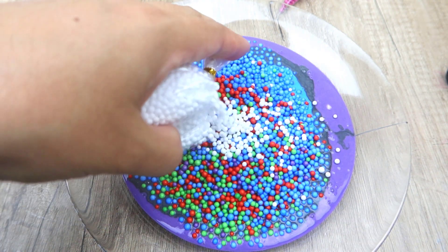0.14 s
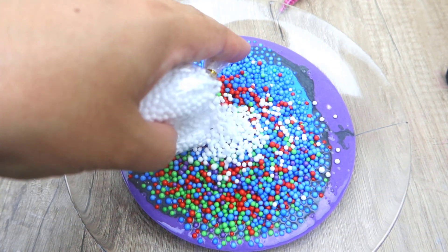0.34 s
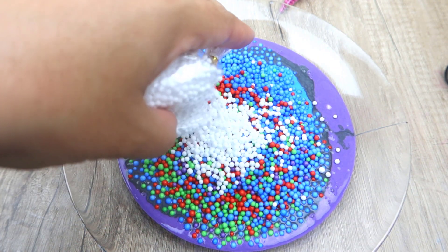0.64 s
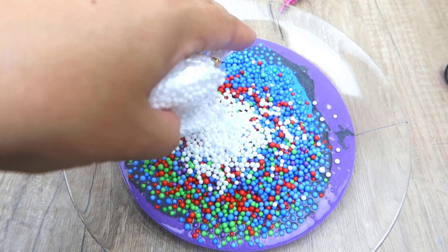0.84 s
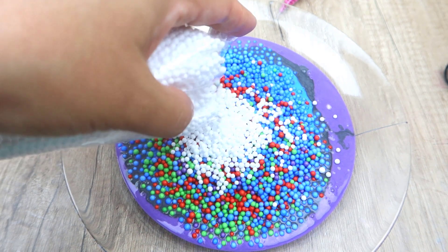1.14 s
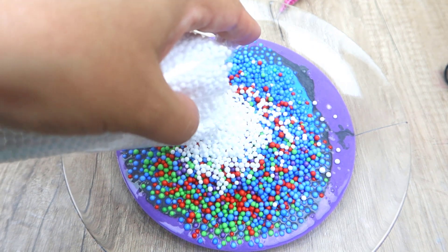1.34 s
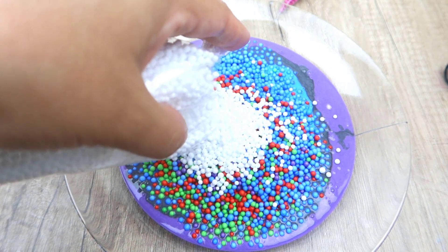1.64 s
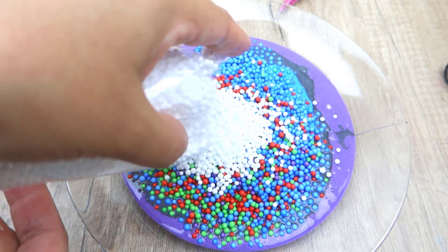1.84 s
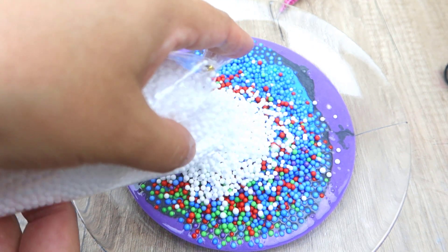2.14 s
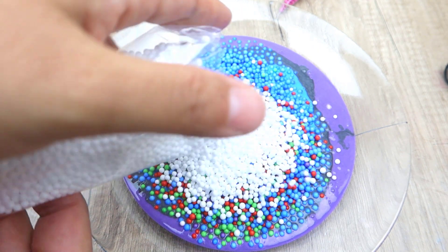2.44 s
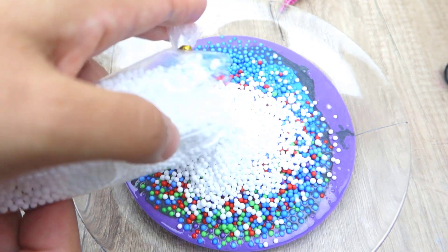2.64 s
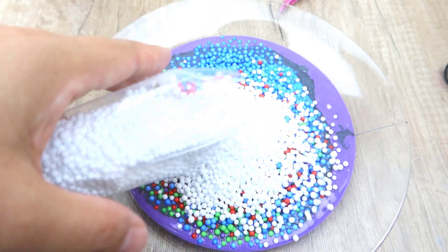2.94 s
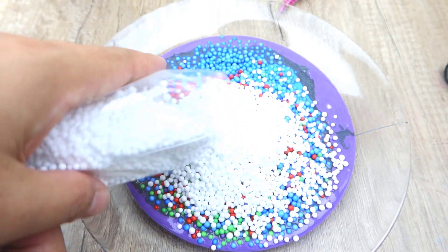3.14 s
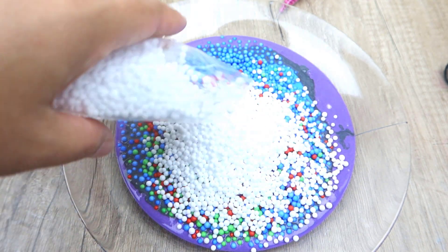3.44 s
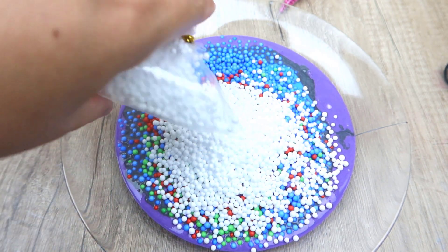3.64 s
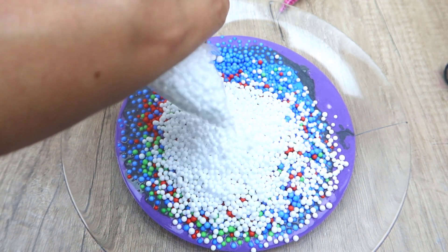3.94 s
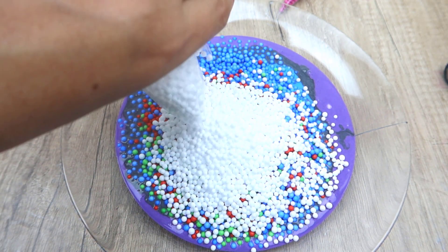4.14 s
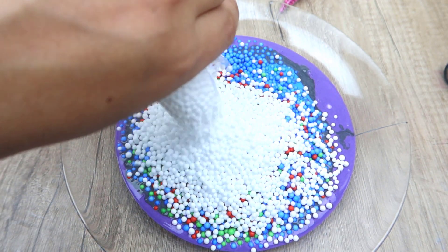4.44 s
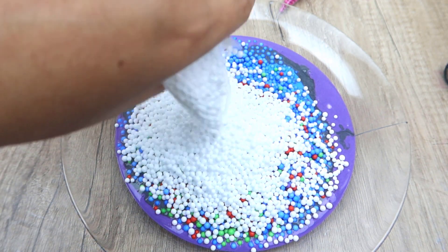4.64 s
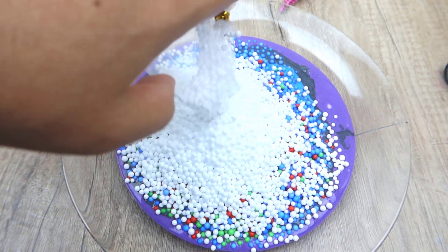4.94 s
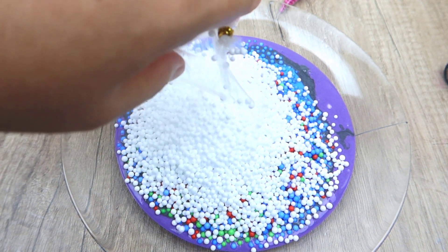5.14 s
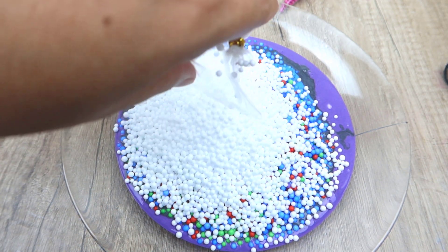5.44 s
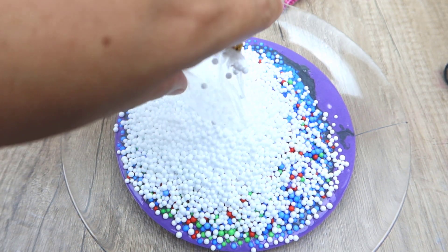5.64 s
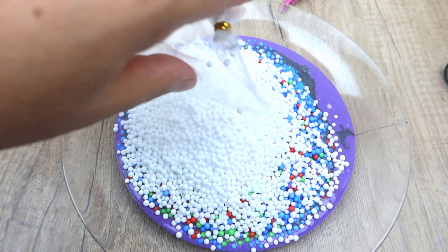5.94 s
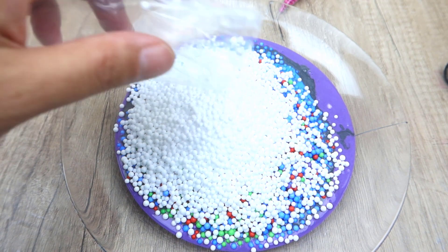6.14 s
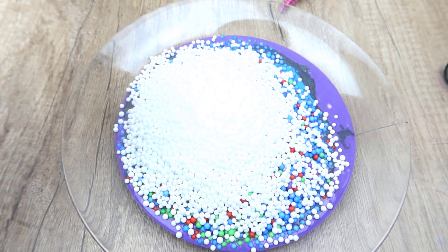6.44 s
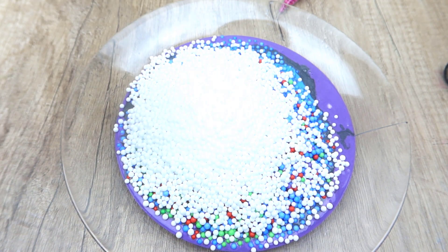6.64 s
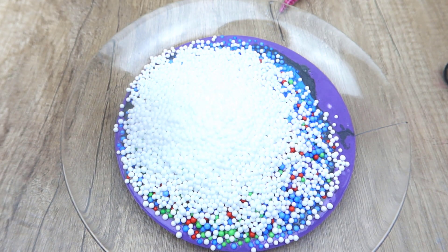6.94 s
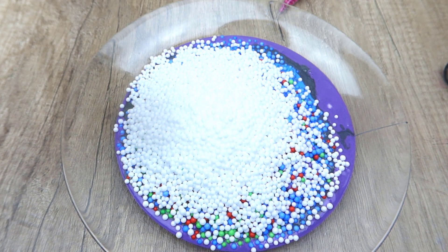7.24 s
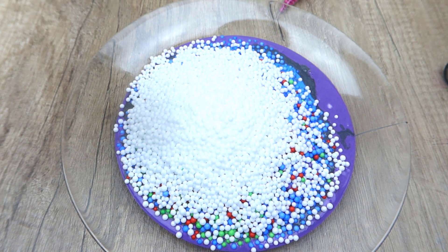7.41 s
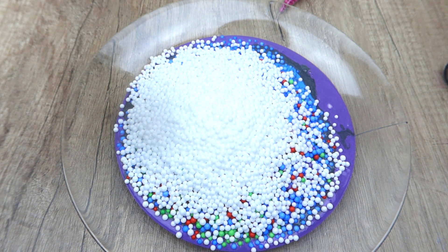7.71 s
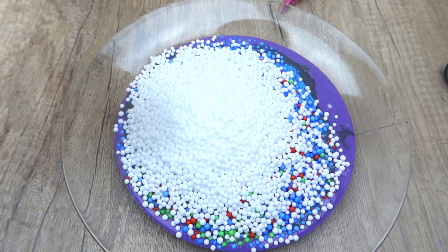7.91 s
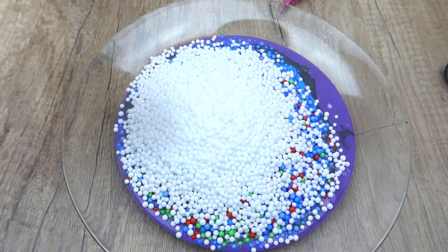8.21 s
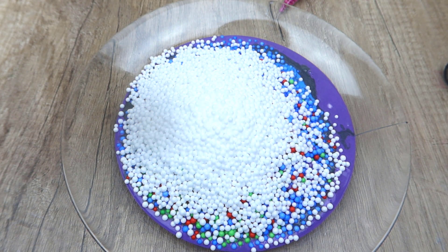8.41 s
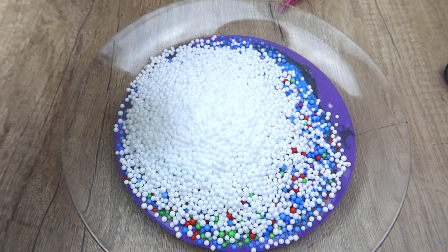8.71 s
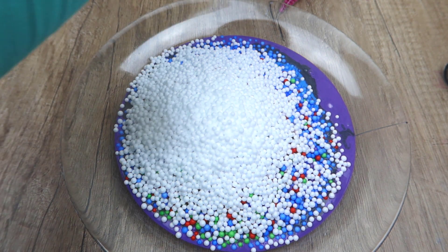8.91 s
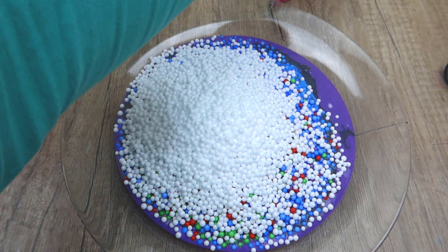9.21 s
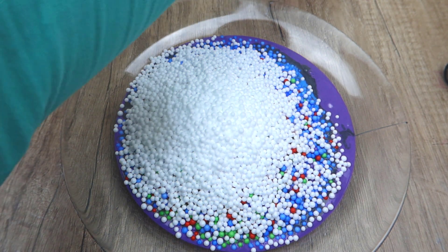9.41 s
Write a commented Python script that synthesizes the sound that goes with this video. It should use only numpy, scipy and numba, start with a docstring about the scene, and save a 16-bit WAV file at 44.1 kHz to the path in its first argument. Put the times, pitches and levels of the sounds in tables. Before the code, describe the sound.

Close, dry tabletop sound with faint hiss and low hum. A brief bead rush leads into a hard, clipping knock that ducks the level. Soft trickling swells into repeated dry, sandy rushes with crisp film crackles and little pops, strongest midway. Then it thins to near silence, slack plastic rustles, a few duller knocks rattle the stand, and another bag is picked up with coarse crackling.

```python
"""A soft rush of foam beads comes first, then a hard bump on the camera stand that overloads the microphone.
The level ducks and recovers. Beads hiss from a squeezed plastic bag as its film crackles and pops;
the empty bag is put down, the stand is bumped again, and a second bag is picked up.
Bags and beads are showers of tiny random contacts passed through tone filters and shaped by swells;
bumps are short pushes that set the stand ringing, with clicks of hard contact or overload crackle."""
import sys
import numpy as np
from scipy import signal
from scipy.fft import rfft, irfft
from scipy.io import wavfile
from scipy.ndimage import uniform_filter1d
from numba import njit

SR = 44100
rng = np.random.default_rng(int(sys.argv[2]) if len(sys.argv) > 2 else 0)


def to_wav(s):
    """Save 16-bit WAV."""
    ch = np.atleast_2d(s).T  # columns
    pcm = np.round(np.clip(ch, -1, 1) * 32767)  # PCM
    wavfile.write(sys.argv[1], SR, pcm.astype(np.int16))


N = 422037  # length in samples
T = np.arange(N) / SR  # time in seconds

# Tone of the quiet room with microphone hiss: pitch_hz, level_db (relative)
ROOM_TONE = [(25, -28.5), (42, -9.5), (55, -8.5), (75, -15), (107, -11), (170, -14.5), (350, -16.5),
             (670, -20.5), (1100, -25), (2900, -33), (7000, -36), (15500, -38.5)]
ROOM_DB = -50  # average (rms) level of the room noise
# Mains hum: pitch_hz, level_db (rms)
MAINS_HUM = [(50, -54), (102, -62)]

# Tone of the creaking stand: pitch_hz, level_db (relative)
CREAK_TONE = [(30, -37), (80, -18), (180, -13), (280, -6), (350, 0), (440, -5.5), (560, -12.5),
              (800, -19.5), (2000, -51.5)]
# The stand creaks as it is brushed and settles: peak_s, level_db, rise_s, fall_s
CREAKS = [(.42, -21.5, .045, 0.044), (.567, -30, .02, 0.012), (.6, -31.5, 0.0073, 0.017),
          (.73, -44.5, 0.079, 0.035), (.85, -42, .025, 0.071), (1.62, -46.5, 0.084, 0.22),
          (5.72, -48.5, 0.077, .12)]
# The stand sways and shivers after a push: start_s, level_db (before rise and decay), pitch_hz, t60_s
SHIVERS = [(.211, -3, 70, 0.056), (.283, 2, 48, 0.099), (.608, -36, 328.5, 0.28), (.668, -34.5, 360, 0.18),
           (.877, -34.5, 354, 0.49), (5.7, -29, 80, 0.058), (7.485, -29.5, 335, 0.096),
           (7.495, -31, 140, 0.15), (7.533, -19, 85.5, .045), (7.546, -10.5, 358, 0.054),
           (7.575, -34.5, 349, 0.61), (7.622, -33, 139, 0.1), (7.7415, -5.5, 317, 0.035)]
# Blows on the stand, and the crackle of the overloaded microphone at 0.277-0.289 s:
# start_s, thump_peak_db, contact_ms, click_db (relative to the thump)
KNOCKS_AND_OVERLOAD = [(0.2086, 8, 0.89, 0), (0.2173, 19, 1.72, -66), (0.229, 6, 0.79, -50),
                       (0.277, 22.5, 0.74, 0), (0.2814, 12, 0.86, 2), (0.2864, 22, 1.66, 3.5),
                       (0.2872, 9.5, 1.9, 11), (0.306, 32, 1.03, -24), (.316, 13, 1.6, -27),
                       (7.486, -31, 2.1, -40), (7.5305, -13.5, 0.97, -27), (7.5341, -2.5, 1.13, -51),
                       (7.6085, -13.5, 1.4, -50), (7.641, -25, 1.2, -40), (7.7347, -18.5, 0.88, -30),
                       (7.7384, -12, 1.5, -52)]
RING_HZ = 937  # one of the pitches in the next table
# Ringing tones of the stand and camera body: pitch_hz, level_db (relative), t60_s
STAND_TONES = [(151, -19, 0.085), (240, -0.5, 0.015), (292, 0, 0.031), (350, -26, 0.13), (460, -3, 0.036),
               (560, -13.5, 0.028), (860, -5.5, 0.041), (RING_HZ, -23.5, 0.24), (1100, -16.5, 0.091),
               (1800, -12.5, 0.028)]
# Tone of the clicks, which are hard contact or overload crackle: pitch_hz, level_db (relative)
CLICK_TONE = [(300, 6.5), (1500, -3.5), (4000, -9.5), (6000, -6.5), (8500, -16.5), (16000, -22.5)]

# Tone of the full second bag: pitch_hz, level_db (relative)
FULL_BAG_TONE = [(150, -1), (500, -5), (1050, 2), (1400, 5), (1780, 8), (2150, 4), (2900, 0.5), (3800, 4),
                 (4400, 4), (5300, 3), (6500, -4.5), (9000, -11.5), (12000, -16), (16000, -32)]
# The second bag is touched, gripped and lifted:
# peak_s, level_db, rise_s, fall_s, treble_db (relative to the level)
GRIPS = [(8.07, -49.5, 0.019, 0.033, -12), (8.41, -57, 0.11, 0.21, -5.5), (9.168, -37.5, 0.0018, .018, -2),
         (9.192, -39.5, .007, .012, -7), (9.213, -32.5, .003, .013, -14), (9.276, -46, 0.0065, .009, -11),
         (9.333, -28, 0.0038, 0.023, -1.5), (9.395, -30, 0.025, 0.041, -3), (9.49, -44, .07, 0.067, -7),
         (9.565, -36, 0.033, .05, -4)]
# Tone of the emptied, slack bag: pitch_hz, level_db (relative)
SLACK_BAG_TONE = [(100, -15), (400, 3), (900, 8), (1600, 5), (2600, 2.5), (4400, 2), (6000, -15.5),
                  (9500, -26.5), (16000, -36)]
# The empty bag crumples as it is laid down and later nudged:
# peak_s, level_db, rise_s, fall_s, treble_db (relative to the level)
CRUMPLES = [(6.93, -40, 0.028, .04, -17), (6.99, -40.5, .03, 0.054, -7.5), (7.04, -45, 0.018, 0.057, -6),
            (7.17, -51, 0.023, 0.065, -8), (7.26, -45, 0.03, 0.018, 0.5), (7.315, -52.5, .03, 0.038, -2),
            (8.582, -45, 0.0078, 0.052, -33)]

# Taut film popping: start_s, level_db (before rise and decay), pitch_hz
POPS = [(2.337, -27, 405), (4.028, -18, 1630), (4.272, -22.5, 447), (4.581, -16.5, 1380),
        (4.884, -19, 1200), (5.023, -24.5, 1240), (5.172, -13.5, 3700), (5.401, -28, 1260),
        (5.401, -33, 2200), (5.6206, -20.5, 1530), (6.921, -24, 720), (7.2591, -20.5, 1470),
        (8.575, -26.5, 2260), (9.217, -23, 1900)]
POP_T60_S, POP_REF_HZ = 0.016, 1000  # ring time at this pitch; it falls with the root of the pitch
# Large folds of film snapping: start_s, level_db, thud_db and treble_db (both relative to the level)
CRACKLES = [(0.8269, -30, -10, -7), (2.022, -29.5, -12, -15), (2.3384, -29.5, -5, -10),
            (2.4883, -23.5, -22, -11), (3.1, -28.5, -9, -16), (3.1977, -26.5, -14, -11),
            (3.2678, -26.5, -32, -12), (3.2824, -27, -15, -8), (3.3843, -23.5, -9, -8),
            (3.4269, -26.5, -20, -30), (3.512, -24.5, -1, -22), (3.5754, -37.5, 3, -6),
            (3.7859, -20, -8, -15.5), (3.8645, -28, -0.5, -22), (3.919, -19, -7.5, -13.5),
            (4.028, -32.5, 2, -32), (4.085, -31.5, -6, -23), (4.5074, -19, -30, -8),
            (4.5803, -21.5, -9.5, -30), (4.882, -28.5, -8, -33), (5.172, -25.5, -8.5, -6.5),
            (5.4, -40, 8, -30), (5.4714, -42, 0.5, -13), (5.5126, -47.5, 5, -15), (5.82, -34, -19, -4.5),
            (5.8608, -38.5, -18, -5.5), (6.2876, -44, -13, -22), (6.8917, -45, 9, -18),
            (6.9208, -37.5, 10, -5), (7.1478, -38.5, -26, -13), (7.234, -33, -6, -20),
            (7.26, -34.5, -11, -5), (7.3066, -33.5, -13, -15), (8.197, -48.5, -11, 4.5),
            (8.427, -49.5, -20, 5.5), (8.576, -47, 12, -30), (9.2099, -33.5, -6, -1),
            (9.3307, -30, -5, -12), (9.4363, -36.5, 0.5, -1)]
# Tone of a snapping fold: pitch_hz, level_db (relative)
FOLD_TONE = [(100, -15.5), (350, -11), (900, -9), (1550, -1), (2450, -10), (3800, -5), (5000, -6),
             (6200, -11), (9500, -10.5), (12000, -26), (16000, -25)]

# Tone of the beads in the first bag: pitch_hz, level_db (relative)
BEAD_TONE = [(60, -23), (400, -12.5), (900, -7), (1200, -5), (1680, 1), (2000, -5.5), (2450, -4.5),
             (3500, -3), (4700, -2.5), (5300, -7), (6000, -13.5), (10000, -17), (11500, -24.5),
             (16000, -34)]
# Squeezes and shakes of the first bag, each sending a rush of beads:
# peak_s, level_db, rise_s, treble_db (relative to the level)
SQUEEZES = [(0.077, -45.5, 0.068, -18), (0.169, -41, 0.063, -12.5), (0.457, -38.5, 0.058, -16),
            (0.72, -44, .055, -17), (0.827, -45.5, 0.046, -11), (1.059, -45.5, .125, -12.5),
            (2.007, -37, 0.062, -9), (2.276, -38, 0.14, -13.5), (2.497, -34.5, 0.074, -10.5),
            (2.85, -40.5, 0.072, -11.5), (3.036, -46, 0.068, -14), (3.25, -37.5, 0.1, -16),
            (3.418, -42.5, 0.073, -24), (3.55, -46, 0.075, -25), (3.857, -33, 0.15, -15),
            (4.316, -31.5, 0.12, -14.5), (4.515, -30, 0.13, -13), (4.751, -31, 0.089, -12.5),
            (4.975, -40, 0.29, -11), (5.715, -50.5, .13, -15), (6.58, -49, 0.14, -8), (6.8, -54, 0.11, -2)]
RELEASE_SHARE = 0.7  # fall time of a rush as a share of its rise time
# The trickle between squeezes until the bag is empty: time_s, level_db
TRICKLE = [(0, -52), (.6, -51), (.95, -54), (1.4, -48), (2.7, -44.5), (3.7, -48.5), (4.2, -50),
           (5.3, -52.5), (6, -78), (6.9, -90)]
TRICKLE_TREBLE_DB = -9.5  # relative to the trickle level
SWELL_SHAPE = 1.12  # 1 is a pointed swell, 2 a rounded one


def undb(db):
    """Turn decibels into gain."""
    return 10 ** (np.asarray(db) / 20)


def unit(x):
    """Scale to an average (rms) level of 1."""
    return x / np.sqrt(np.mean(x ** 2))


def add(out, s, x):
    """Mix x into out from time s."""
    i = max(int(s * SR), 0)
    out[i:i + len(x)] += x[:max(N - i, 0)]


def colour(x, points, size=4096):
    """Give x a tone set by (Hz, dB) points, with a filter that never rings before the sound."""
    hz, db = np.transpose(points)
    f = np.maximum(np.fft.rfftfreq(size, 1 / SR), 1)
    log_gain = np.log(undb(np.interp(np.log(f), np.log(hz), db)))
    # Folding the cepstrum onto its first half makes the filter causal.
    cepstrum = irfft(log_gain)
    cepstrum[1:size // 2] *= 2
    cepstrum[size // 2 + 1:] = 0
    response = irfft(np.exp(rfft(cepstrum)))
    return signal.fftconvolve(x, response)[:len(x)]


def split(x, hz, order=4):
    """Split x into parts below and above hz whose sum is level at every pitch."""
    parts = []
    for kind in ("low", "high"):
        sos = signal.butter(order, hz, kind, fs=SR, output="sos")
        parts.append(signal.sosfilt(np.vstack([sos, sos]), x))
    return parts


def fade(t, t60):
    """Die away steadily, by 60 dB in t60 seconds."""
    return undb(-60 * t / max(t60, 1e-4))


def walk(rate):
    """Wander smoothly at random, with an rms of 1, taking `rate` new values a second."""
    k = int(SR / rate)
    steps = np.repeat(rng.standard_normal(N // k + 1), k)
    return unit(uniform_filter1d(steps, k)[:N])


def grains(per_s, spread_db):
    """Tiny contacts at random moments, a few larger than the rest."""
    hit = rng.random(N) < per_s / SR
    sign = np.sign(rng.standard_normal(N))
    size_db = spread_db * np.minimum(rng.exponential(size=N), 5)
    return hit * sign * undb(size_db)


def swells(rows):
    """Loudness of overlapping movements (peak s, dB, rise s, fall s); their powers add."""
    power = np.zeros(N)
    for s, db, rise_s, fall_s in rows:
        t = np.arange(max(-4 * rise_s, -s), 4 * fall_s, 1 / SR)
        away = np.where(t < 0, -t / rise_s, t / fall_s)  # distance from the peak
        level = undb(db) * np.exp(-away ** SWELL_SHAPE)
        add(power, s + t[0], level ** 2)
    return np.sqrt(power)


def rings(rows, rise_s):
    """Each row is one pure tone that swells quickly and dies away."""
    out, t = np.zeros(N), T[:16384]
    for s, db, hz, t60 in rows:
        tone = np.sin(2 * np.pi * hz * t) * fade(t, t60)
        add(out, s, undb(db) * tone * (1 - np.exp(-t / rise_s)))
    return out


def rustle(moves, contacts, spectrum, steady=0, steady_treble=0):
    """Contacts ring the bag as loudly as the hand moves it, with a separate level for the treble."""
    body, sheen = split(colour(contacts, spectrum), 5700)
    level = swells([(s, db, rise, fall) for s, db, rise, fall, treble in moves])
    bright = swells([(s, db + treble, rise, fall) for s, db, rise, fall, treble in moves])
    return np.hypot(level, steady) * unit(body) + np.hypot(bright, steady_treble) * unit(sheen)


def room():
    """Steady dull room noise and microphone hiss, plus the pure tones of mains hum."""
    hum = sum(undb(db) * unit(np.sin(2 * np.pi * hz * T)) for hz, db in MAINS_HUM)
    noise = unit(colour(rng.standard_normal(N), ROOM_TONE))
    return undb(ROOM_DB) * noise + hum


def reflections(x, wet_db=-15, t60=0.14):
    """The table and near walls return a short, faint tail of fading noise."""
    t = T[:12000]
    tail = rng.standard_normal(len(t)) * fade(t, t60) * (t > .003)  # starts 3 ms late
    tail /= np.sqrt(np.sum(tail ** 2))
    return x + undb(wet_db) * signal.fftconvolve(x, tail)[:N]


def creak():
    """Small slips reach the microphone through the stand as a hollow rumble."""
    slips = colour(grains(per_s=700, spread_db=0.6), CREAK_TONE)
    return unit(slips) * swells(CREAKS)


def shivers():
    """A pushed stand sways and shivers in fading tones."""
    return rings(SHIVERS, rise_s=0.0016)


def knocks_and_overload(click_t60=0.0073, whine_hz=6600, whine_db=-26, whine_t60=0.022):
    """Brief pushes ring the stand; the clicks, noise with a high tone, are hard contact or overload crackle."""
    out, t = np.zeros(N), T[:16384]
    ring = sum(undb(db) * np.cos(2 * np.pi * hz * t) * fade(t, t60) for hz, db, t60 in STAND_TONES)
    whine = undb(whine_db) * np.sin(2 * np.pi * whine_hz * t) * fade(t, whine_t60)
    for s, db, contact_ms, click_db in KNOCKS_AND_OVERLOAD:
        push = np.sin(np.pi * np.minimum(1000 * t / contact_ms, 1))  # half a sine wave
        thump = signal.fftconvolve(push, ring)[:len(t)]
        click = colour(rng.standard_normal(len(t)) * fade(t, click_t60), CLICK_TONE)
        click = click / abs(click).max() + whine
        add(out, s, undb(db) * (thump / abs(thump).max() + undb(click_db) * click))
    return out


def second_bag(clump_db=1.5):
    """A full bag is gripped: coarse, bright crinkling whose contacts come in clumps."""
    creases = grains(per_s=4000, spread_db=3.0) * undb(clump_db * walk(160))
    return rustle(GRIPS, creases, FULL_BAG_TONE)


def empty_bag(clump_db=2.5):
    """Slack film creases in uneven clumps against the table."""
    creases = grains(per_s=1500, spread_db=0.7) * undb(clump_db * walk(170))
    return rustle(CRUMPLES, creases, SLACK_BAG_TONE)


def pops():
    """Taut patches of film ring briefly, the higher ones for a shorter time."""
    rows = [(s, db, hz, POP_T60_S * np.sqrt(POP_REF_HZ / hz)) for s, db, hz in POPS]
    return rings(rows, rise_s=0.00031)


def crackles(snap_t60=0.0015, crumple_db=-8, crumple_t60=0.022, shaken_db=-22, shaken_t60=0.063):
    """A fold snaps, its neighbours crumple after it, and the beads behind it are shaken."""
    out, t = np.zeros(N), T[:4096]
    crumple = undb(crumple_db) * fade(t, crumple_t60)
    shaken = undb(shaken_db) * fade(t, shaken_t60)
    force = fade(t, snap_t60) + crumple + shaken
    for s, db, thud_db, treble_db in CRACKLES:
        chance = rng.standard_normal((2, len(t)))
        rough = chance[0] * np.exp(.5 * chance[1])  # noise with some extra-large spikes
        low, rest = split(colour(rough * force, FOLD_TONE), 1000, order=2)
        middle, high = split(rest, 5500)
        for part, part_db in ((low, thud_db), (middle, 0), (high, treble_db)):
            peak = np.sqrt(uniform_filter1d(part ** 2, size=128).max())  # loudest 3 ms
            add(out, s, part * undb(db + part_db) / peak)
    return out


def small_folds(per_s, t60):
    """Little folds give way at random, each in a brief spray of contacts."""
    starts = abs(grains(per_s, spread_db=0.0))
    force = signal.fftconvolve(starts, fade(T[:4096], t60))[:N]
    return unit(force * rng.standard_normal(N))


def pouring(surge_db=2.6, ticks_db=-6, folds_db=-10):
    """Thousands of light beads rub each other in small surges; single ones tick on the creasing film."""
    rubbing = unit(grains(per_s=9000, spread_db=1.0)) * undb(surge_db * np.tanh(walk(45)))
    ticks = undb(ticks_db) * unit(grains(per_s=300, spread_db=2.5))
    folds = undb(folds_db) * small_folds(per_s=30, t60=0.016)
    rushes = [(s, db, rise, RELEASE_SHARE * rise, treble) for s, db, rise, treble in SQUEEZES]
    trickle_s, trickle_db = np.transpose(TRICKLE)
    trickle = undb(np.interp(T, trickle_s, trickle_db))
    trickle_treble = trickle * undb(TRICKLE_TREBLE_DB)
    return rustle(rushes, rubbing + ticks + folds, BEAD_TONE, trickle, trickle_treble)


def scene():
    """Bags and beads come through the air; bumps, overload crackle and room are added without reflections."""
    airborne = pouring() + empty_bag() + second_bag() + crackles() + pops()
    bumps = knocks_and_overload() + shivers() + creak()
    return (reflections(airborne) + bumps + room())[None]


@njit
def gain_cut(over_db, release, lag):
    """The cut in dB jumps to each overshoot, sinks back steadily, and is followed with a lag."""
    cut, held, now = np.empty(len(over_db)), 0., 0.
    for i in range(len(over_db)):
        held = max(over_db[i], held - release, 0.)
        now += (held - now) * lag
        cut[i] = now
    return cut


def record(dry, limit_db=-4, release_db_per_s=240, lag_s=0.0053):
    """A slow limiter lets the loudest peaks clip, then ducks everything until it recovers."""
    over_db = 20 * np.log10(abs(dry[0]) + 1e-9) - limit_db
    cut_db = gain_cut(over_db, release_db_per_s / SR, 1 / (lag_s * SR))
    clipped = np.clip(dry * undb(-cut_db), -1, 1)
    low_pass = signal.ellip(8, .2, 70, 16300, fs=SR, output="sos")  # nothing much above 16300 Hz
    return signal.sosfilt(low_pass, clipped)


dry = scene()
out = record(dry)
to_wav(out)
```